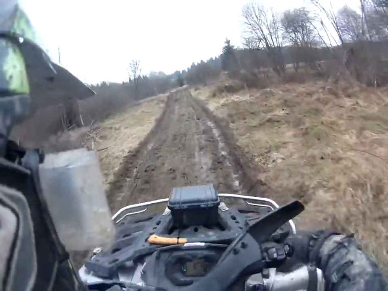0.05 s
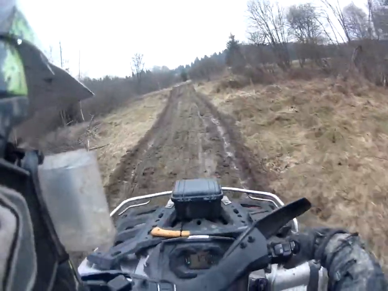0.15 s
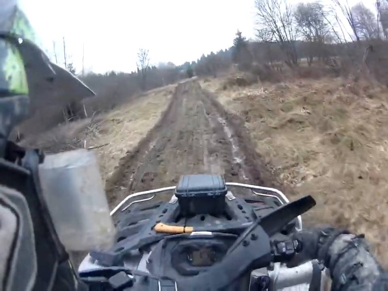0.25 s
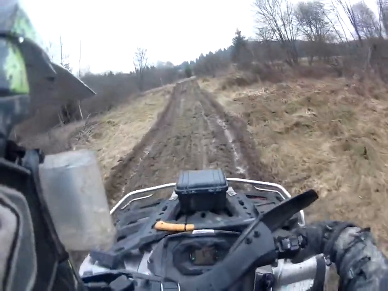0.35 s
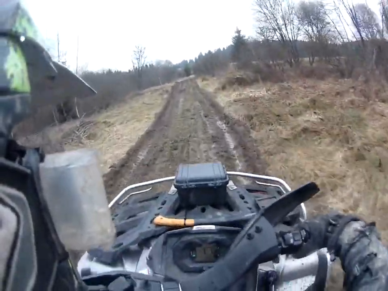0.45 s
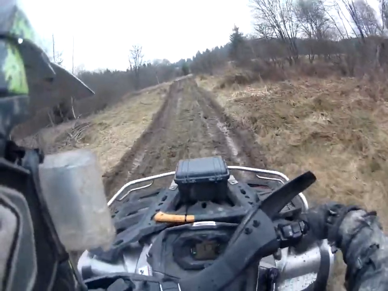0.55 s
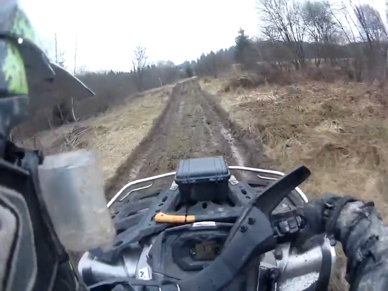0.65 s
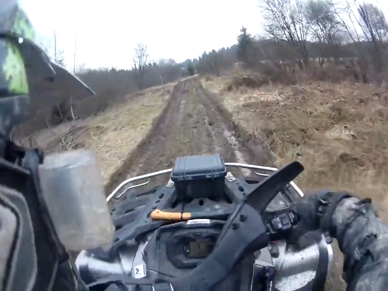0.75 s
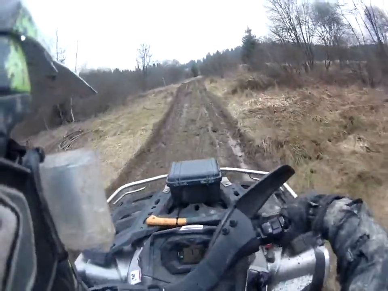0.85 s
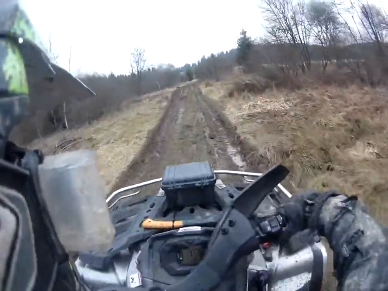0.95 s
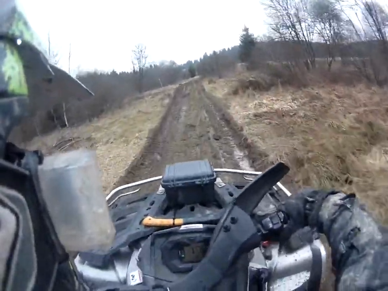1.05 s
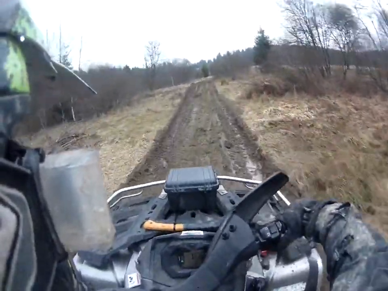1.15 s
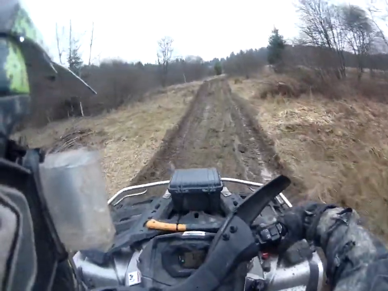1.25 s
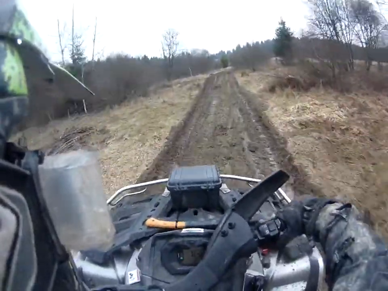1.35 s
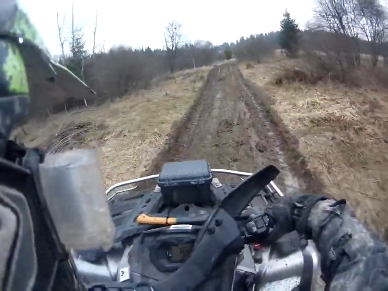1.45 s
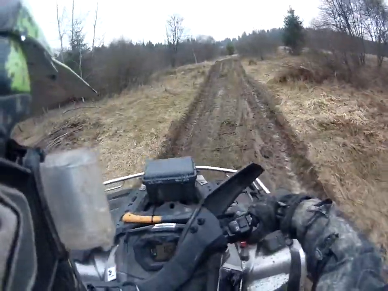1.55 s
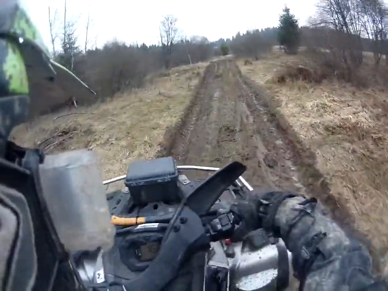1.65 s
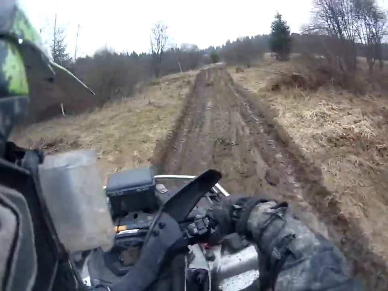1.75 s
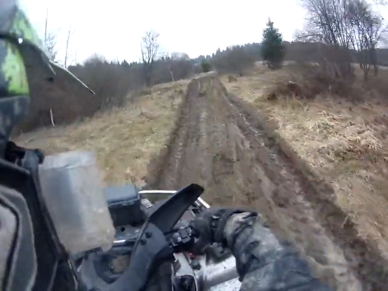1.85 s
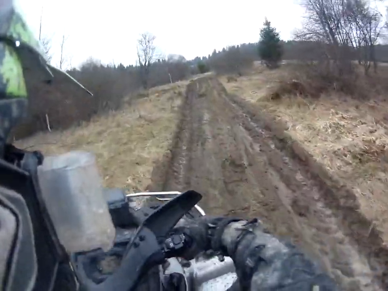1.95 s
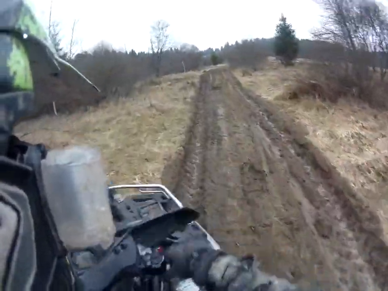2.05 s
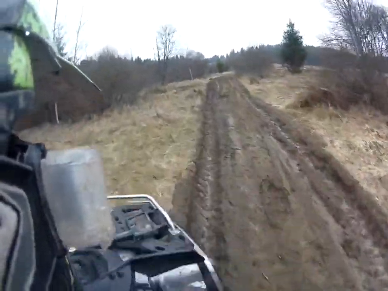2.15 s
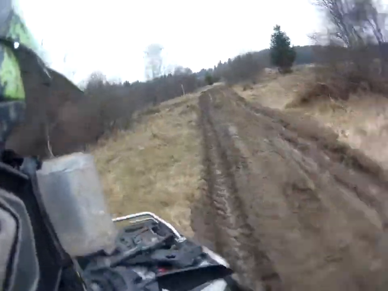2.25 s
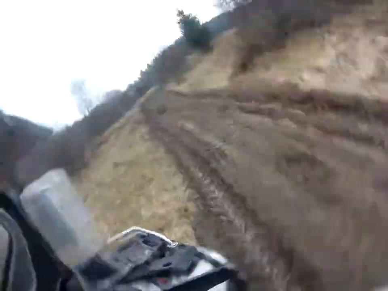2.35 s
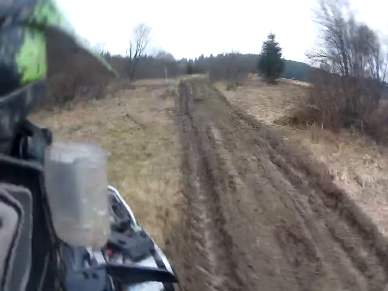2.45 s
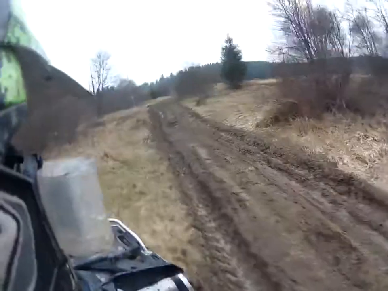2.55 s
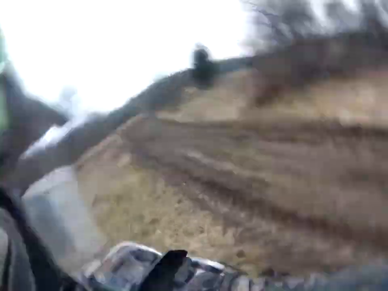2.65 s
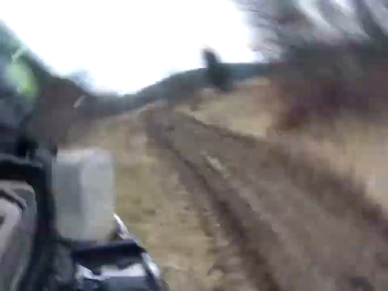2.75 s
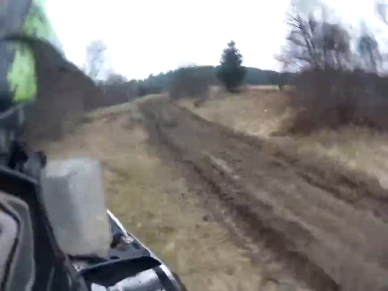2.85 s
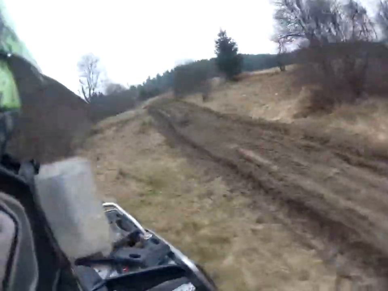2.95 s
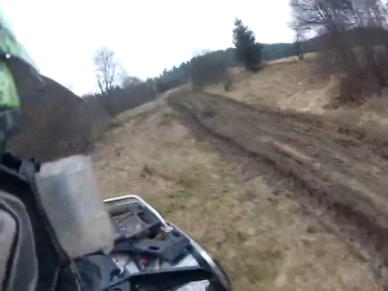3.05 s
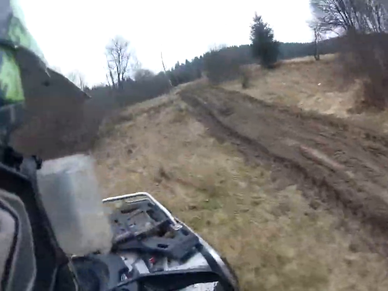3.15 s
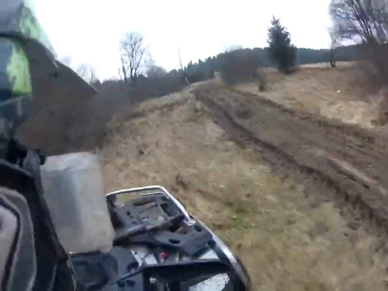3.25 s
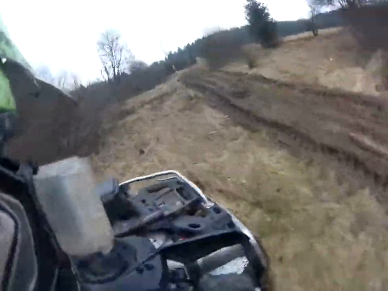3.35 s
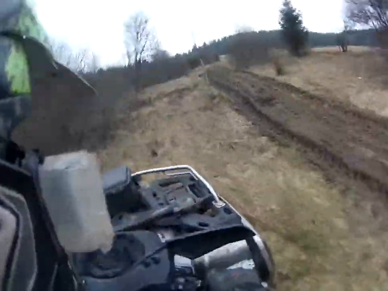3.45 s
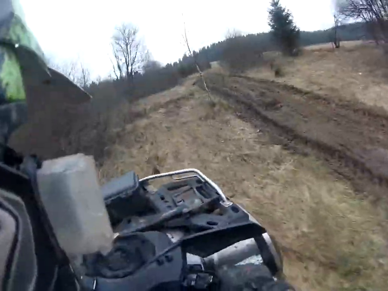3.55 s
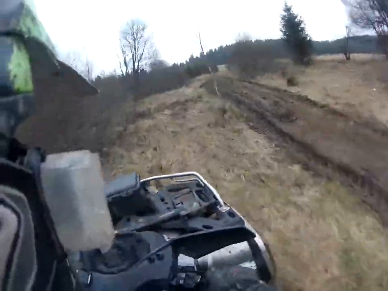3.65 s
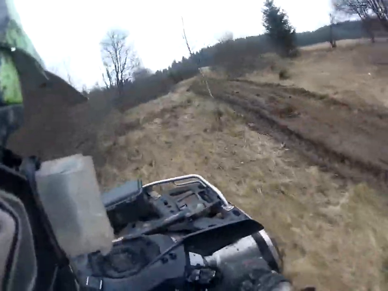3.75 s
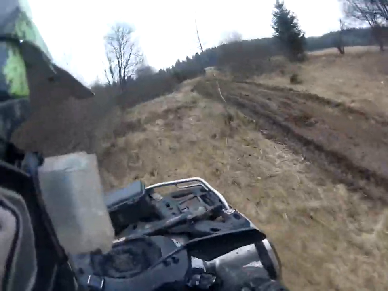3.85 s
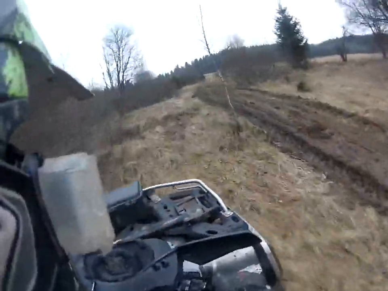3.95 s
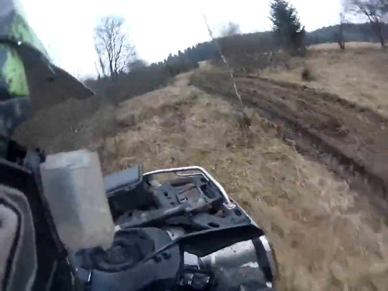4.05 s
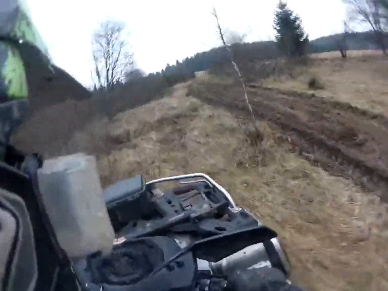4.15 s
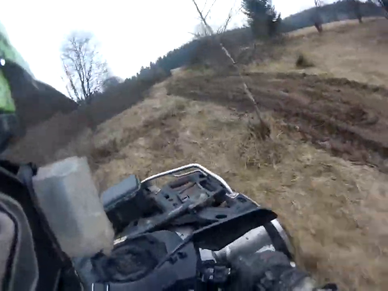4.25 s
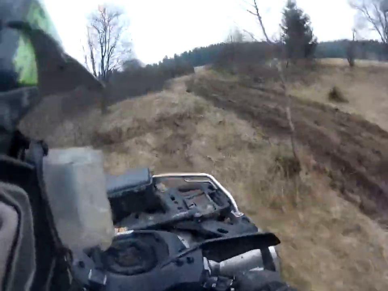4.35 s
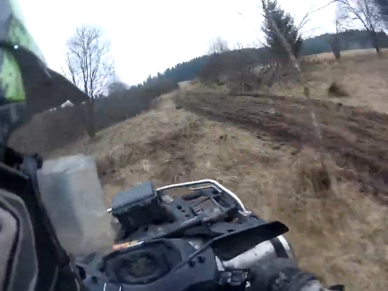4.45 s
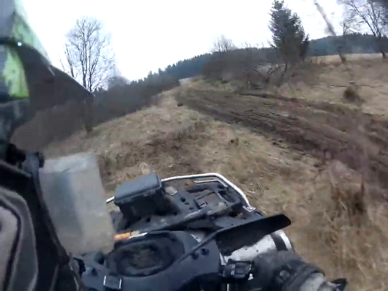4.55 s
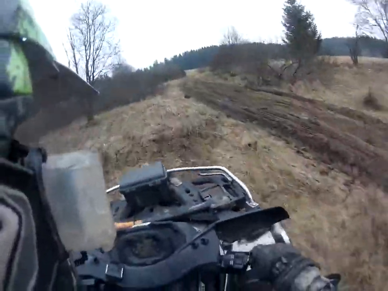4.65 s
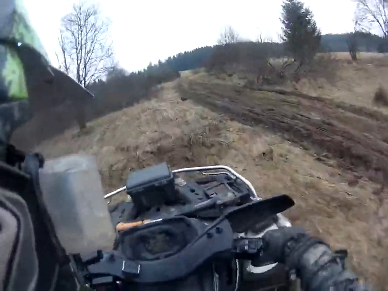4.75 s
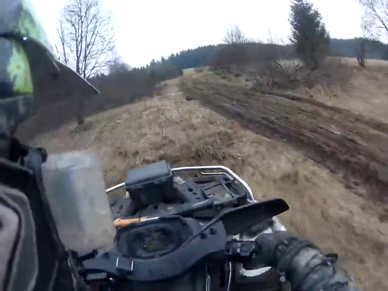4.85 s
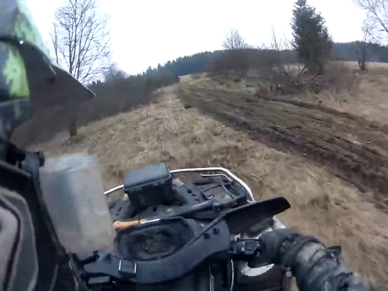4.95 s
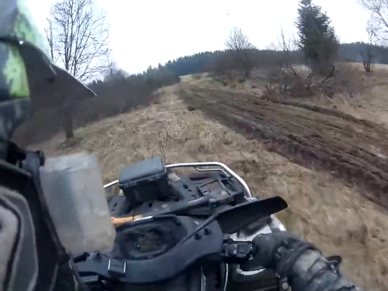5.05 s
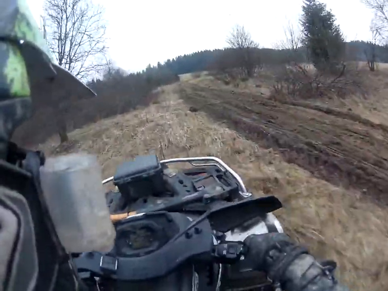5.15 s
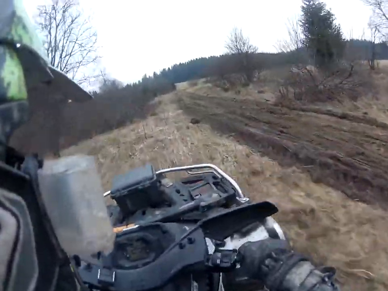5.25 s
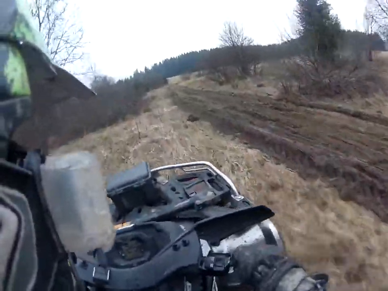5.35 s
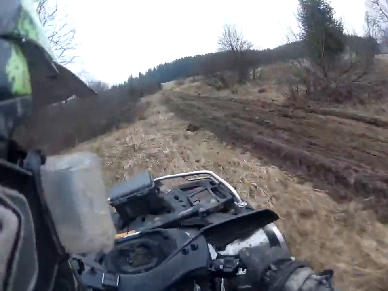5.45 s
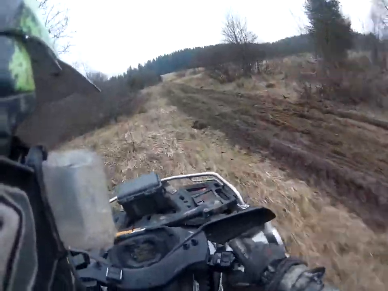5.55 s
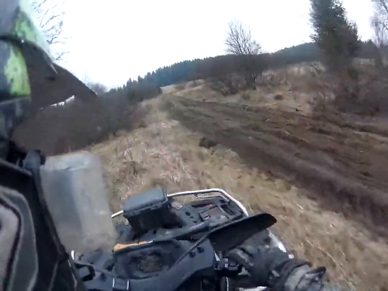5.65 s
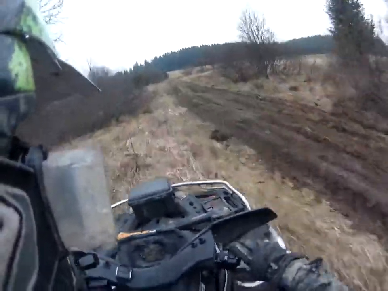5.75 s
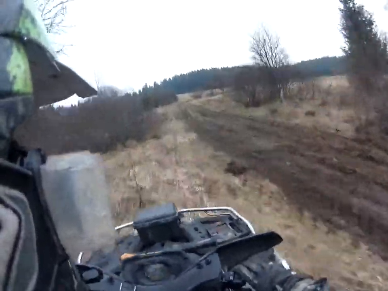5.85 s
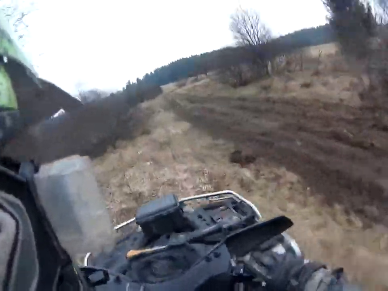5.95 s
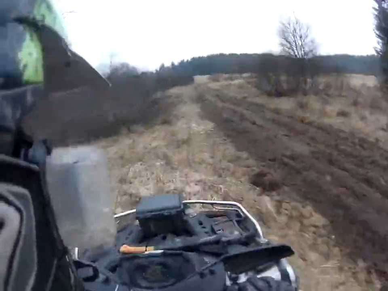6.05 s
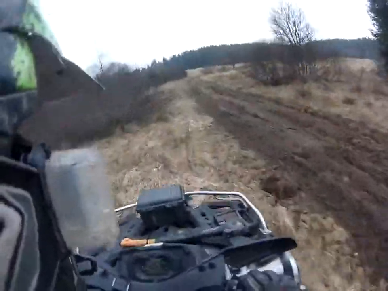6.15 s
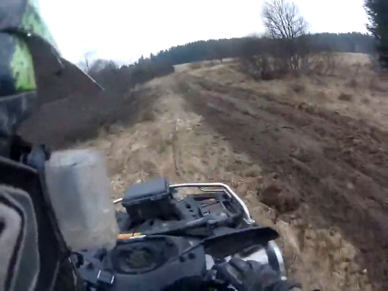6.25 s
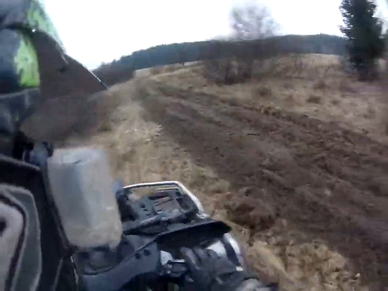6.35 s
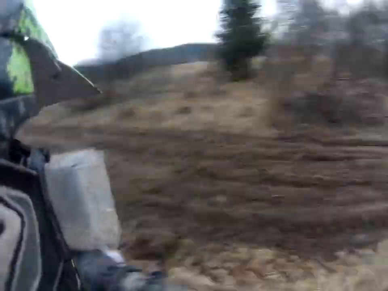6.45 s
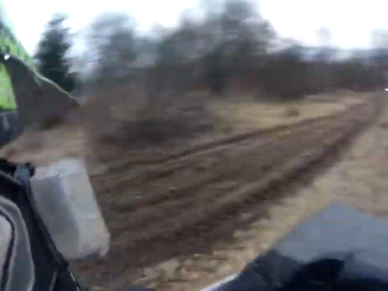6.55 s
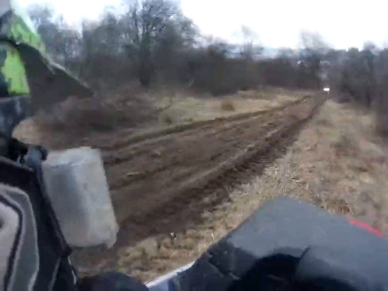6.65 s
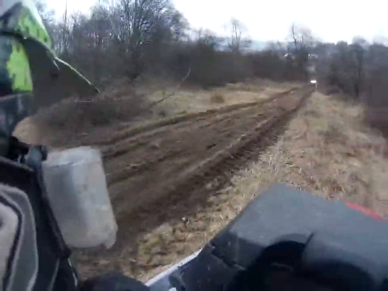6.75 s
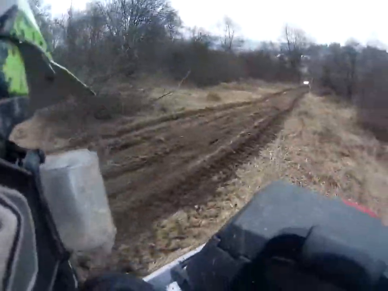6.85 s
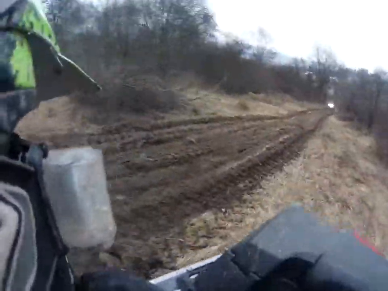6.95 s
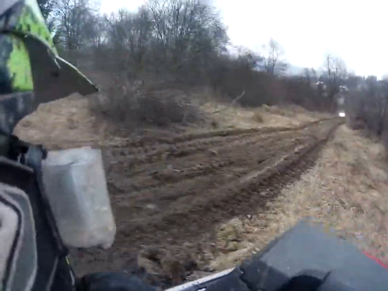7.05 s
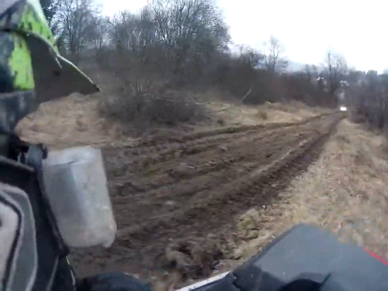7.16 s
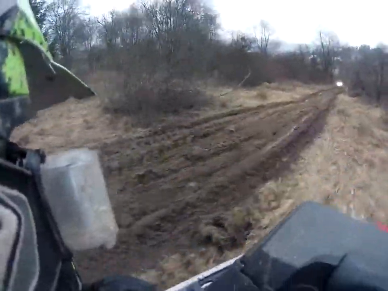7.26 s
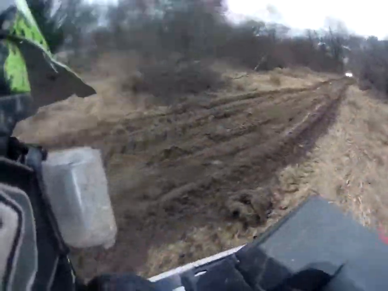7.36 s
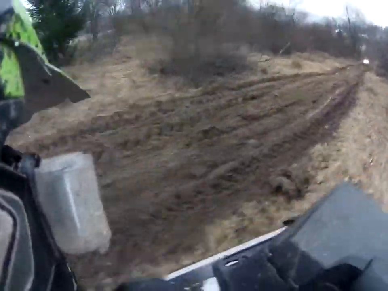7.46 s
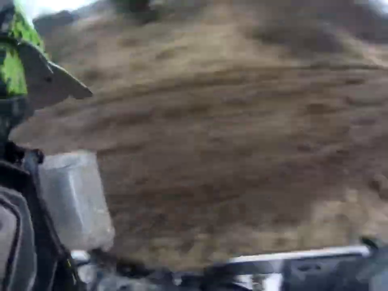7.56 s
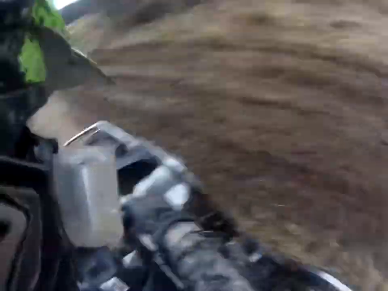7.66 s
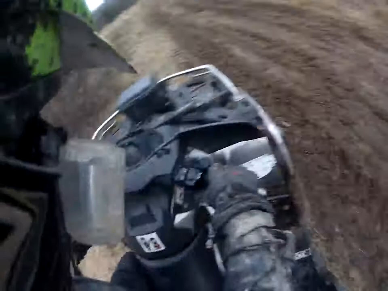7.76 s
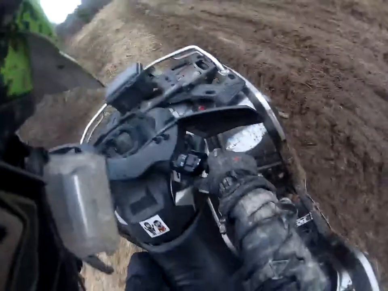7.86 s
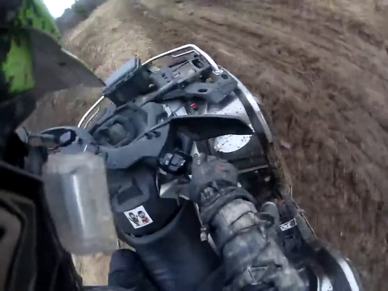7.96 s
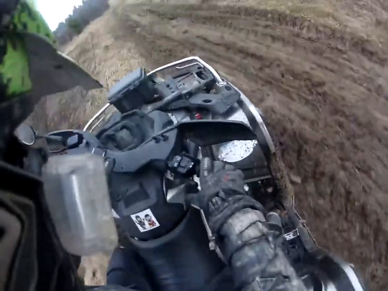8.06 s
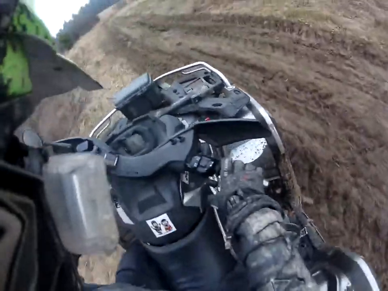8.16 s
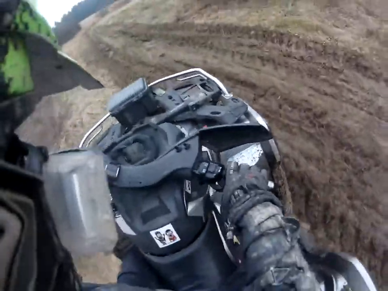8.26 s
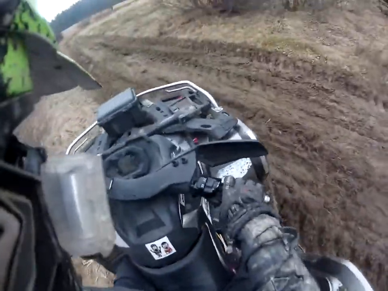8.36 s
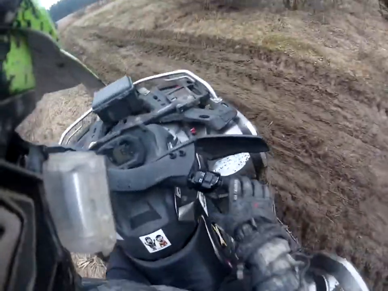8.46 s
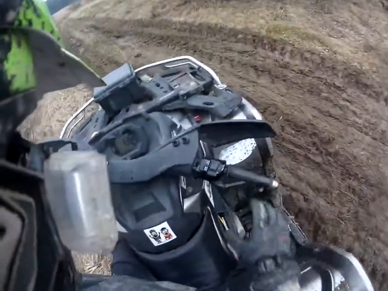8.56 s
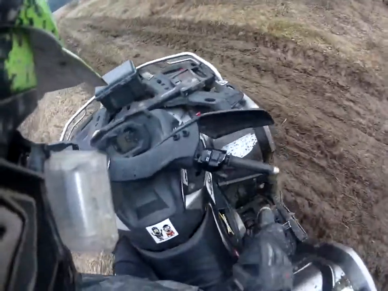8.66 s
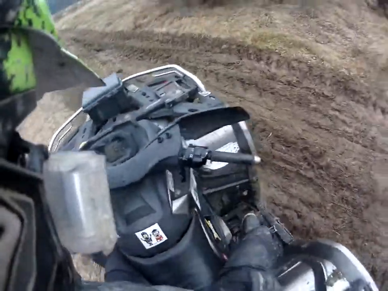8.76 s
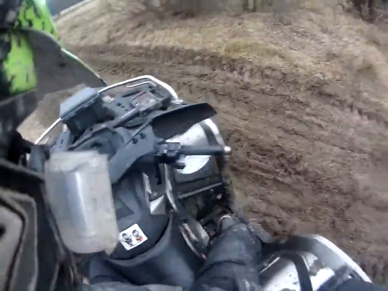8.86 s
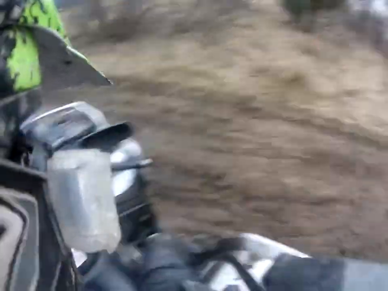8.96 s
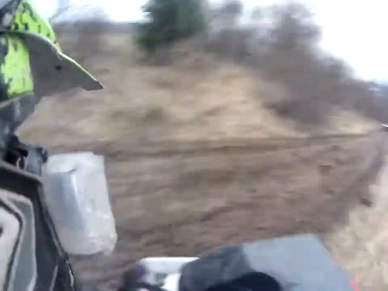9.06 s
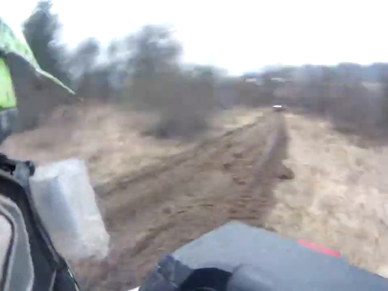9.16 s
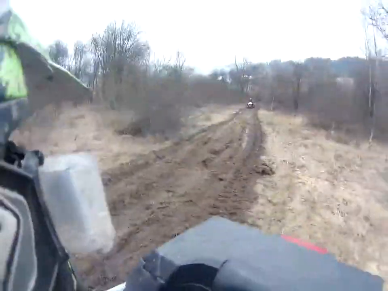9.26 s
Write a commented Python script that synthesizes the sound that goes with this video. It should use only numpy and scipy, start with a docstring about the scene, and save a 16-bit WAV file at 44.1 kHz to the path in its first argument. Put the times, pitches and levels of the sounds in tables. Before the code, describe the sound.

Throaty, uneven quad engine pulls hard with hard plastic knocks near the start, then falls away to a lumpy idle under a humming fan.

```python
"""First the steady, uneven beat of a V-twin quad bike on a muddy track, heard from a camera worn by the rider.
The engine climbs under load, rolls off, is blipped once and settles to a lumpy idle while its radiator fan hums.
Engine pulses are sums of harmonics; clatter, hiss and ringing are filtered noise; whines are sines.
Gear knocks against the camera housing on the bumps, as short bursts of its resonances.
The microphone adds hiss and a thin whistle."""
import sys
import numpy as np
from scipy import signal
from scipy.fft import rfft, irfft, next_fast_len
from scipy.io import wavfile
from scipy.ndimage import uniform_filter1d

SR = 44100
rng = np.random.default_rng(int(sys.argv[2]) if len(sys.argv) > 2 else 0)


def persist_wave(psi):
    """Save psi, clipped to +-1, as 16-bit WAV."""
    counts = np.round(np.clip(psi, -1, 1) * 32767).astype(np.int16)
    wavfile.write(sys.argv[1], SR, np.atleast_2d(counts).T)


N = 410130
TIME = np.arange(N) / SR

# airy spectrum shared by the engine's hiss and the rubbing cloth: f/Hz, relative level/dB
HISS_SPECTRUM = [(2500, -19), (3300, -10), (4100, -11.5), (4950, -4), (5400, -4), (6100, -2), (6900, -12.5),
                 (8000, -19.5), (10000, -20.5), (15000, -41)]
SECOND_FIRING = 280 / 720  # in turns of the four-stroke cycle, after the first firing
REFERENCE_SPEED = 40.5  # cycles/s, near the top of the climb: clatter, hiss and gear levels refer to it
ENGINE_SHADOW_DB = -9 + 6  # loss of clatter, rasp and hiss behind the rider's body


def amp(db):
    """Decibels to gain."""
    return 10 ** (np.asarray(db) / 20)


def unit(x):
    """Scales to rms 1."""
    return x / np.sqrt(np.mean(x ** 2) + 1e-20)


def curves(rows, t=TIME):
    """Each column of a time table, joined by straight lines."""
    s, *columns = np.transpose(rows)
    return [np.interp(t, s, column) for column in columns]


def spectrum(points, hz):
    """Reads a (f/Hz, level/dB) table on a log-frequency axis."""
    f, db = np.transpose(points)
    return np.interp(np.log(hz + 1), np.log(f + 1), db)


def colour(x, gain):
    """Filters x by a gain that is a function of frequency; rms 1."""
    size = next_fast_len(len(x))
    bins = rfft(x, size) * gain(np.fft.rfftfreq(size, 1 / SR))
    return unit(irfft(bins, size)[:len(x)])


def noise(points, gate=1):
    """Gated noise shaped by a spectrum table; rms 1."""
    return colour(gate * rng.standard_normal(N), lambda f: amp(spectrum(points, f)))


def ringing(hz, width_hz):
    """Noise in one resonance; rms 1."""
    return colour(rng.standard_normal(N), lambda f: 1 / (1 + ((f - hz) / width_hz) ** 2))


def wander(hz):
    """Slow random drift of rms 1, up to about the given rate."""
    return colour(rng.standard_normal(N), lambda f: np.exp(-(f / hz) ** 2))


def swell(s, length):
    """A smooth rise and fall starting at s."""
    return np.sin(np.pi * np.clip((TIME - s) / length, 0, 1))


def add(mix, s, sound):
    """Adds a sound at time s."""
    part = mix[round(s * SR):][:len(sound)]
    part += sound[:len(part)]


def causal_log(log_gain):
    """Gives a log gain the phase of a body that rings only after it is struck (minimum phase)."""
    return np.conj(signal.hilbert(log_gain))


def strike(body, vary_db=3.0, order=2048):
    """One blow on a body with the given resonances, peak 1; each lands a little differently."""
    varied = np.array(body, float) + [0, vary_db] * rng.standard_normal((len(body), 2))
    log_gain = np.log(amp(spectrum(varied, abs(np.fft.fftfreq(order, 1 / SR)))))
    blow = np.fft.ifft(np.exp(causal_log(log_gain))).real  # sharp start, short ring
    return blow / abs(blow).max()


def crank_speed(t=TIME):
    """Mean crank speed in four-stroke cycles per second; the pitch of the whole engine follows it."""
    # crank speed: t/s, speed/(cycles/s)
    speed_points = [(0, 33.2), (.6, 33.2), (1.13, 31.8), (1.7, 32.6), (2.02, 32.3), (2.2, 35.2),
                    (2.4, 32.8), (2.55, 35.3), (2.7, 34.2), (2.9, 36.6), (3.12, 36.7), (3.48, 40.7),
                    (4.3, 39.4), (4.9, 39.4), (5.15, 40.9), (5.42, 40.4), (5.82, 28), (6.2, 24.4),
                    (6.55, 19.5), (6.84, 19.4), (7.14, 24.7), (7.44, 22.4), (7.81, 23.6), (8.03, 17.8),
                    (8.33, 13.3), (9.3, 11.25)]
    return curves(speed_points, t)[0]


def throttled(shut, wide_open, t=TIME):
    """A value that moves with the throttle between its two ends."""
    # throttle: t/s, opening (0-1)
    openings = [(0, 0.78), (1.95, 0.64), (2.6, 0.73), (3.7, 0.88), (4.2, 0.81), (4.45, 0.84), (5.15, 0.92),
                (5.38, 0.87), (5.55, 0.66), (6, 0.67), (6.5, 0.22), (7, 0.64), (7.75, 0.48), (8.08, 0.11),
                (9.3, 0.35)]
    return shut + (wide_open - shut) * np.clip(curves(openings, t)[0], 0, 1)


def turned_away(t=TIME):
    """How far the rider, looking back, has turned from the machine, 0-1; the body then shadows it."""
    # looks back: t/s, length/s
    looks_back = [(6.29, 1.6), (8.85, 1.2)]
    return np.interp(t, TIME, sum(swell(s, length) for s, length in looks_back))


def microphone_noise(channels, shared_db=-68, own_db=-68.0, whistle_db=-76.0, whistle_hz=10519.6):
    """Self-noise, partly separate in each channel, and an electronic whistle."""
    # self-noise common to the channels: f/Hz, relative level/dB per Hz
    floor_spectrum = [(100, -38), (2500, 6.5), (4000, 2.5), (6000, -2), (8000, -2), (11000, -6),
                      (15200, -22)]
    # hiss that differs between the channels: f/Hz, relative level/dB per Hz
    spread_spectrum = [(300, -35), (1000, -23), (2000, -23), (3000, -1), (6000, 0.5), (8000, 1.5),
                       (11000, 1), (15000, 0.5)]
    own = np.array([noise(spread_spectrum) for _ in range(channels)])
    whistle = np.sqrt(2) * np.sin(2 * np.pi * whistle_hz * TIME)
    return amp(shared_db) * noise(floor_spectrum) + amp(own_db) * own + amp(whistle_db) * whistle


def jacket_rubs(grains_per_s=700):
    """Cloth rubbing on the camera mount: random grains over a faint steady rustle."""
    # jacket on the mount: t/s, length/s, level/dB
    rubs = [(2.33, 0.07, -57), (2.44, .17, -68), (2.67, .09, -53.5), (2.76, 0.26, -62.5), (7.62, 0.28, -69)]
    grains = (rng.random(N) < grains_per_s / SR) + 0.046
    return noise(HISS_SPECTRUM, grains) * sum(amp(db) * swell(s, length) for s, length, db in rubs)


def squeals():
    """A brief gear whine and a brake squeal, each noise in one narrow resonance."""
    # squeals: t/s, length/s, f/Hz, width/Hz, level/dB
    squeal_rows = [(7.3, .2, 1680, 50, -64), (9.11, .14, 5600, 330, -65)]
    return sum(amp(db) * swell(s, length) * ringing(hz, width) for s, length, hz, width, db in squeal_rows)


def bumps(thump_s=0.0013, thump_db=-21, thump_growth=0.2, rattle_db=-46, rattle_t60=0.11, order=2048):
    """Knocks ring the housing and push it once; ticks ring a small clip; a faint rattle trails both."""
    # knocks on the housing: t/s, peak level of the body ring/dB, crack relative to it/dB
    knocks = [(2.4618, -30, -7), (2.4889, -14, -7.5), (2.4998, -32, -7), (2.539, -32, -20),
              (2.5539, -29.5, -4), (2.7198, -35, -7), (2.801, -30, -19), (2.8267, -24, -12),
              (2.8435, -30, 1), (2.8458, -6.5, -10.5), (2.854, -22, -0.5), (2.907, -31, -5),
              (4.4199, -30, -12), (6.055, -40, -5), (6.711, -39.5, -20)]
    # small plastic ticks: t/s, peak level/dB
    ticks = [(2.3658, -31), (2.4545, -32), (2.4582, -34), (2.7727, -33.5), (2.811, -32), (2.818, -30.5),
             (2.8652, -28), (4.381, -29.5), (7.4968, -22)]
    # resonances of housing body, its hard crack and the small plastic clip: f/Hz, relative level/dB
    shell = [(100, -25), (400, -2.5), (620, -6), (880, 1), (1150, -7), (1380, 2), (1900, -9.5), (2080, -11),
             (2250, -28), (4000, -51), (9000, -75)]
    crack = [(1700, -36), (2300, 0), (2850, -5), (3100, -3), (3400, 0), (3850, -1), (4200, -14), (4750, 3),
             (5300, -3.5), (5800, 0), (6600, -21), (7800, -9), (8600, -23), (15000, -32)]
    plastic_clip = [(1000, -34), (3000, -11), (4300, -9), (5300, 2.5), (6100, 3.5), (7000, -11),
                    (8100, -2.5), (9500, -16), (12000, -16), (15500, -20)]
    out, t = np.zeros(N), np.arange(order) / SR
    push = -np.sin(np.pi * t / thump_s / 2) * np.exp(1 - t / thump_s)
    for s, db, crack_db in knocks:
        ring = strike(shell) + amp(crack_db) * strike(crack)
        # the push grows less than the ring as the knock gets harder
        add(out, s, amp(db) * ring + amp(thump_db + thump_growth * db) * push)
    for s, db in ticks:
        add(out, s, amp(db) * strike(plastic_clip))
    tail = rng.standard_normal(order) * amp(rattle_db - 60 * t / rattle_t60)
    return out + signal.oaconvolve(out, tail)[:N]


def radiator_fan(on_s=5.7, rise_s=.25, steady_hz=351.5, sag_hz=9, settle_s=0.49, level_db=-51,
                 octave_db=-24, shadow_db=-9, waver=0.00073):
    """The electric fan cuts in as the engine rolls off; its blade tone sags to a steady pitch."""
    age = np.maximum(TIME - on_s, 0)
    hz = (steady_hz + sag_hz * np.exp(-age / settle_s)) * (1 + waver * wander(8))
    blades = 2 * np.pi * np.cumsum(hz) / SR
    tone = np.sqrt(2) * (np.sin(blades) + amp(octave_db) * np.sin(2 * blades))
    return amp(level_db + shadow_db * turned_away()) * tone * np.minimum(age / rise_s, 1)


def belt_casing(casing_hz=1340, casing_width_hz=55, upper_hz=2410, upper_width_hz=40, upper_db=-15):
    """Two resonances of the belt casing ring under a steady pull."""
    # pulls: t/s, length/s, level/dB
    pulls = [(-.7, 2.65, -58.5), (4.3, 1.15, -60.5)]
    casing = ringing(casing_hz, casing_width_hz) + amp(upper_db) * ringing(upper_hz, upper_width_hz)
    return casing * sum(amp(db) * swell(s, length) for s, length, db in pulls)


def gear_whine(turns, level_db=-59.5, fall_db_per_cycle=3):
    """Gear teeth whine in step with the crank, and only near its top speed."""
    # the belt drive shifts up, so the gears gain on the crank
    teeth_per_cycle = np.interp(TIME, [3.9, 5], [40, 42])
    speed = np.gradient(turns) * SR
    mesh = np.sin(2 * np.pi * np.cumsum(teeth_per_cycle * speed) / SR)
    db = level_db - fall_db_per_cycle * (REFERENCE_SPEED - crank_speed())
    return amp(db) * np.sqrt(2) * mesh * (1 + 0.13 * wander(12))


def gulp(airbox_hz=212, airbox_width_hz=32, brisk_cycles_per_s2=15, size=8192):
    """Turbulent intake air rings the airbox while the engine changes speed."""
    change = uniform_filter1d(abs(np.gradient(crank_speed())) * SR, size) / brisk_cycles_per_s2
    return amp(throttled(-60.5, -41)) * np.sqrt(abs(change)) * ringing(airbox_hz, airbox_width_hz)


def machinery(turns, puff=0.61, puff_turns=0.07, lag_turns=.05, flutter_db=0.99, loaded_db=7.5, coasting_db=8.0,
              clatter_db_per_octave=3, hiss_db_per_octave=4.5):
    """Clatter of valves, belt and tyres, and hiss: noise that swells after each firing."""
    # clatter under load and coasting: f/Hz, relative level/dB per Hz
    loaded_spectrum = [(15, -36), (35, -21), (70, 2), (130, -0.5), (250, -1.5), (400, 2.5), (520, -4),
                       (850, -9), (1120, -15.5), (1350, -18), (1850, -20.5), (2200, -26), (2500, -25.5),
                       (4000, -50)]
    coasting_spectrum = [(15, -44), (40, 9.5), (90, -1.5), (150, 1.5), (210, 7), (330, 0.5), (520, -1),
                         (640, -6), (800, -5), (1000, -11.5), (1450, -14), (2000, -21.5), (3300, -32),
                         (6000, -36.5)]
    load = throttled(0, 1)
    octaves = np.log2(crank_speed() / REFERENCE_SPEED)
    # throttle shut to wide open; the loaded and coasting gains come on top of the clatter level
    clatter_db = throttled(-52, -42.5) + clatter_db_per_octave * octaves
    hiss_db = throttled(-71.5, -62.5) + hiss_db_per_octave * octaves
    firings = sum(np.exp(-((turns - at - lag_turns) % 1) / puff_turns) for at in (0, SECOND_FIRING))
    gate = (1 + puff * firings) * amp(flutter_db * wander(23))
    loaded = load * amp(loaded_db) * noise(loaded_spectrum, gate)
    coasting = (1 - load) * amp(coasting_db) * noise(coasting_spectrum, gate)
    hiss = amp(hiss_db) * noise(HISS_SPECTRUM, gate)
    return amp(ENGINE_SHADOW_DB * turned_away()) * (amp(clatter_db) * (loaded + coasting) + hiss)


def pipe_response(top_hz=720, order=32768):
    """Causal response of the pipework: (Hz, log gain + j phase)."""
    # exhaust and airbox response: f/Hz, level/dB before the treble roll-off
    pipe = [(25, -18), (45, -3), (60, 4), (80, 3), (98, 5.5), (115, -4), (140, -12.5), (165, -10),
            (205, -5.5), (240, -7), (290, -8.5), (390, -12.5), (470, -16.5), (700, -27)]
    hz = abs(np.fft.fftfreq(order, 1 / SR))
    roll_off = (1 + (hz / top_hz) ** 4) ** 0.38
    log_gain = np.log(amp(spectrum(pipe, hz)) / roll_off + 1e-4)
    return hz[:order // 2], causal_log(log_gain)[:order // 2]


def load_shape(k, t):
    """Gain of each multiple k of the cycle rate, blended between the running states."""
    # state: t/s, state (0 cruise, 1 climb, 2 overrun, 3 blip, 4 idle; values between are blends)
    state_points = [(0, 0), (2, 0), (3.4, 1), (5.38, 1), (5.56, 2), (6.4, 2), (6.9, 3), (7.82, 3), (8.2, 4),
                    (9.3, 4)]
    # pulse shape: multiple of the cycle rate, then level/dB at cruise, climb, overrun, blip, idle
    load_orders = [(1, 2, 9, 3, 13, -10), (2, -7, 5, -3, -5, 0.0), (3, -10.5, 8.5, 2.5, -7, -9),
                   (4, 1.5, 15, 4, 2.5, -10), (5, 6.5, -1, 0, 9, 3.5), (6, 8.5, 7, 4, 13, -3),
                   (7, 2.5, -16, -3.5, -5, -29), (8, -1, -3, -1, 0, 8), (9, 20.5, 17.5, 19, 17, 22),
                   (10, 5, 5.5, -1.5, 4.5, -16), (11, 0, 0, -6, -7, 1), (12, 9, -1.5, 1, 4.5, 12),
                   (13, 0, -3.5, -27, -4.5, 6), (14, -25, 13, 12.5, 10.5, -5), (15, 1.5, 0, -2.5, 1, -13),
                   (16, 3, 1, -3, 2.5, 11.5)]
    state, = curves(state_points, t)
    multiples, *shapes = np.transpose(load_orders)
    db = 0
    for i, shape in enumerate(shapes):
        share = np.maximum(0, 1 - abs(state - i))
        db = db + share * np.interp(k, multiples, shape, right=0)
    return amp(db)


def engine(turns, second=0.83, split_hz=140, boom_rough=0.098, drone_rough=.05, intake_turns=0.2178,
           smear_s=.022, smear_hz=300, count=44, size=100):
    """Two unevenly spaced firings a cycle ring the exhaust (boom), the airbox (drone) and the block (rasp)."""
    # exhaust boom: t/s, level/dB
    exhaust = [(0, -42.5), (1.85, -46), (2.75, -37.5), (3.45, -36), (4.4, -38), (5.28, -34), (5.47, -38.5),
               (5.8, -34), (6.48, -43.5), (6.82, -36), (7.15, -42), (7.72, -38), (8.17, -45.5),
               (8.55, -40.5), (9.3, -42)]
    # engine block and panels shaken by each firing: f/Hz, relative level/dB
    rasp_spectrum = [(260, -25), (340, 0.5), (450, 3.5), (600, 0), (720, 0), (880, -2), (1050, -13),
                     (1350, -17.5), (1800, -21)]
    # line strengths are worked out once every `size` samples
    t, k = TIME[::size], np.arange(1, count + 1)[:, None]
    hz = k * crank_speed(t)
    twin = 1 + second * np.exp(-2j * np.pi * k * SECOND_FIRING)
    # the silencer's chambers delay the upper lines, which smears each pulse
    smear = np.exp(-1j * np.pi * smear_s * hz ** 2 / smear_hz)
    piped = twin * load_shape(k, t) * smear * np.exp(np.interp(hz, *pipe_response()))
    low = 1 / (1 + (hz / split_hz) ** 16)
    boom = piped * low
    # the intake stroke follows the exhaust stroke
    drone = piped * (1 - low) * np.exp(-2j * np.pi * k * intake_turns)
    rasp = twin * smear * amp(spectrum(rasp_spectrum, hz))
    # boom and drone waver randomly in strength; drone and rasp run from throttle shut to wide open
    boom_level = amp(curves(exhaust, t)[0]) * (1 + boom_rough * wander(17)[::size])
    drone_level = amp(throttled(-59, -30, t)) * (1 + drone_rough * wander(10)[::size])
    rasp_level = amp(throttled(-69, -46.5, t) + ENGINE_SHADOW_DB * turned_away(t))
    lines = 0
    for level, part in ((boom_level, boom), (drone_level, drone), (rasp_level, rasp)):
        lines = lines + level * part / np.sqrt((abs(part) ** 2).sum(0) / 2)
    # each line turns at its own multiple of the crank's phase
    step, phase, out = np.exp(2j * np.pi * turns), 1, 0
    for line in lines:
        phase = phase * step
        out = out + (np.interp(TIME, t, line) * phase).real
    return out


def scene(jitter_turns=0.0033, start_turns=.35):
    """The crank runs slightly unevenly; everything reaches the camera as one mono sound."""
    turns = start_turns + np.cumsum(crank_speed()) / SR + jitter_turns * wander(6.1)
    handling = jacket_rubs() + bumps()
    tones = squeals() + radiator_fan() + belt_casing() + gear_whine(turns)
    mono = handling + tones + gulp() + machinery(turns) + engine(turns)
    return np.array([mono, mono])


def record(dry, edge_hz=15400):
    """The microphone adds its noise, and a steep low-pass sets the upper band limit."""
    wet = dry + microphone_noise(len(dry))
    low_pass = signal.firwin(401, edge_hz, window=("kaiser", 8), fs=SR)
    return signal.oaconvolve(wet, low_pass[None], "same")


dry = scene()
out = record(dry)
persist_wave(out)
```